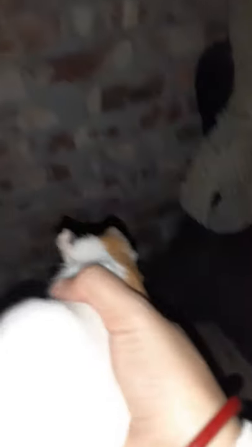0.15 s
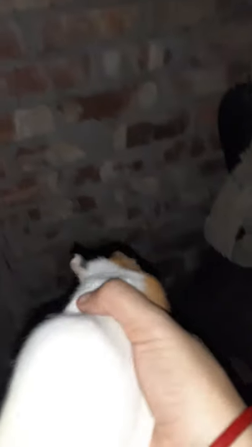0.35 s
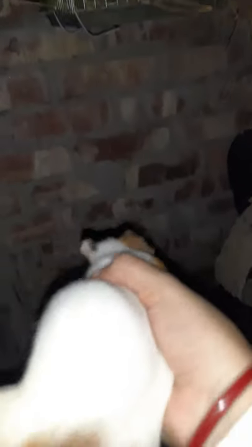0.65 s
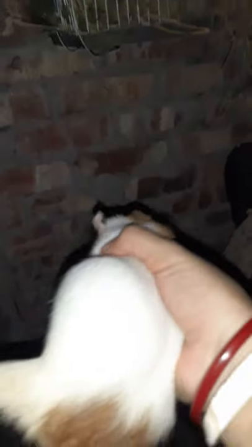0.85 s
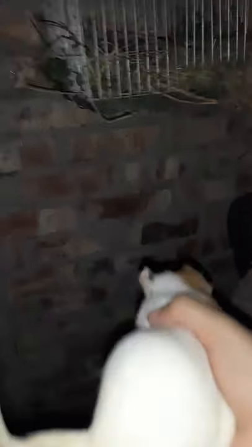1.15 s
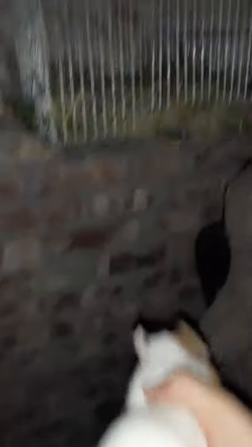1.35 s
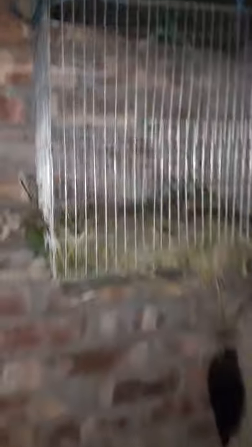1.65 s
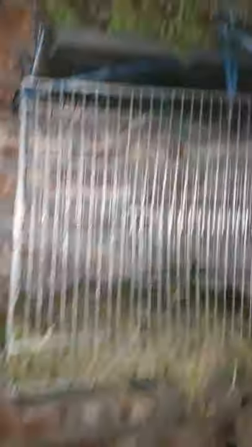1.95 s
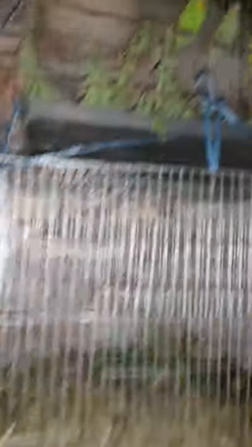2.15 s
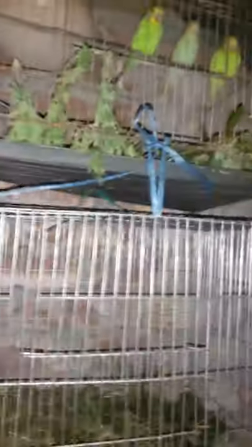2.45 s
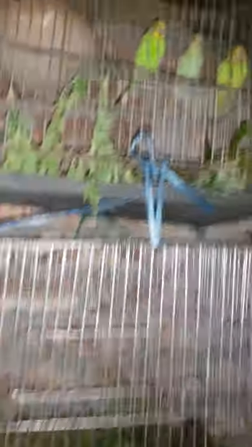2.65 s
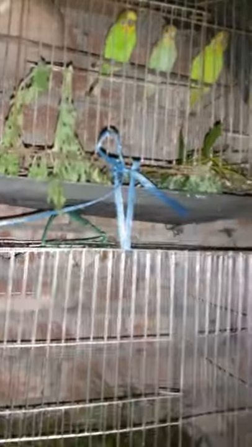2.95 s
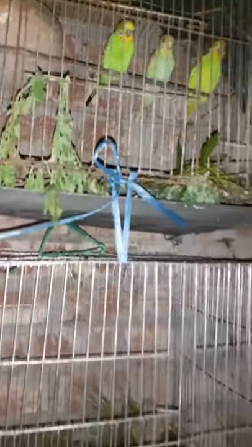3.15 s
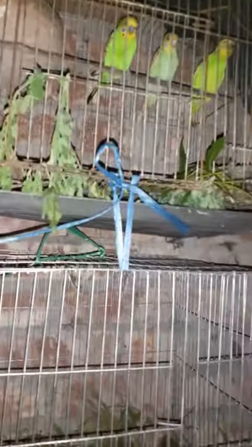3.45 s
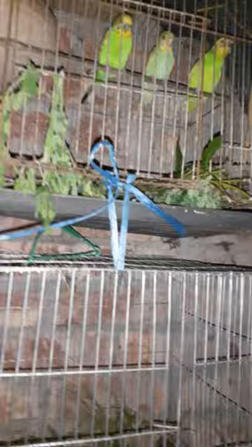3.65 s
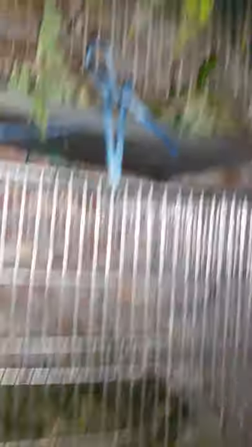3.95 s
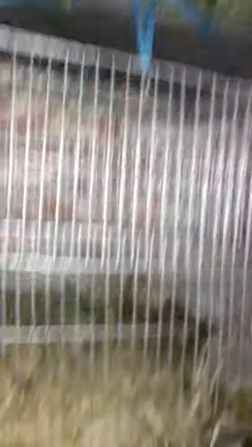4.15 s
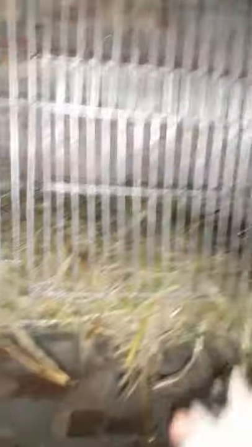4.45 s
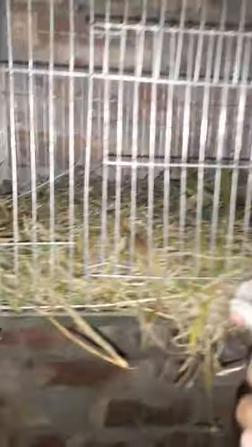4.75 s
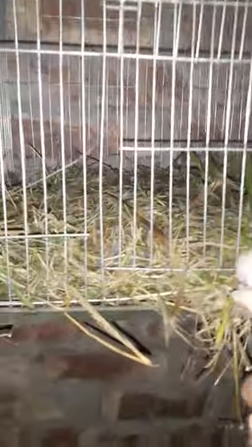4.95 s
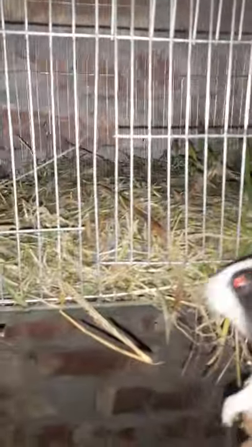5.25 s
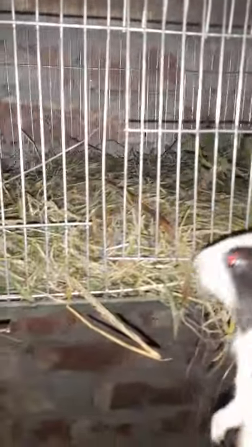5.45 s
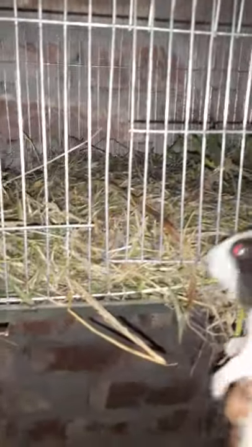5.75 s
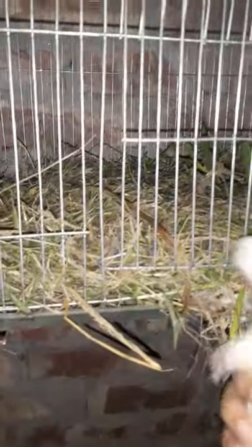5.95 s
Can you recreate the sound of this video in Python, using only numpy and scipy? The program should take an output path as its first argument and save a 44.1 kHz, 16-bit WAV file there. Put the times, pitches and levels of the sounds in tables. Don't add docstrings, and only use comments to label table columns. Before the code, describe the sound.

A guinea pig close by grunts and sweeps up into piercing squeals, then quieter wheeks, ending in a rough scream over a low motor hum.

```python
import sys
import numpy as np
from scipy import signal
from scipy.fft import rfft, irfft, next_fast_len
from scipy.io import wavfile
from scipy.ndimage import uniform_filter1d, minimum_filter1d

SR = 44100
rng = np.random.default_rng(int(sys.argv[2]) if len(sys.argv) > 2 else 0)


def natural_amplitude(level_db):
    exponent = np.asarray(level_db, float) / 20
    return 10 ** exponent


def put_to_file(sound):
    columns = np.atleast_2d(sound).T
    safe = np.clip(columns, -1, 1)
    whole_steps = np.round(safe * 32767)
    wavfile.write(sys.argv[1], SR, whole_steps.astype(np.int16))


N = 269451


def evened(x):
    return x / np.sqrt(np.mean(x ** 2) + 1e-20)


def read(points, hz):
    f, value = np.transpose(points)
    return np.interp(np.log(hz + 1), np.log(f + 1), value)


def slow(hz, size=N):
    return evened(signal.sosfilt(signal.butter(4, hz, fs=SR, output="sos"), rng.standard_normal(size)))


def gate(start, end, edge):
    t = np.arange(N) / SR
    return np.sin(np.pi / 2 * np.clip(np.minimum(t - start, end - t) / edge, 0, 1)) ** 2


def spells(table, edge):
    return sum(natural_amplitude(db) * gate(start, end, edge) for start, end, db in table)


def shaped(x, gain):
    size = next_fast_len(N + 64)
    return irfft(rfft(x, size) * gain(np.fft.rfftfreq(size, 1 / SR)), size)[..., :N]


def tone(turns, hz, db):
    return np.sqrt(2) * natural_amplitude(db) * np.sin(2 * np.pi * turns) * (hz < 17000)


def patchy(x):
    z = signal.stft(x, nperseg=256)[2]
    field = uniform_filter1d(rng.standard_normal(z.shape), size=5, axis=0)
    field = evened(uniform_filter1d(field, size=14, axis=1))
    return signal.istft(z * natural_amplitude(5 * field), nperseg=256)[1][:N]


# frequency in Hz, level in dB per Hz.
AIR = [(15, -25.5), (30, -22.5), (60, -14.5), (100, 4), (140, -6.5), (170, -11.5), (320, -8.5),
       (450, -15.5), (800, -22.5), (2000, -27), (3350, -34), (3800, -40), (8000, -46), (16000, -49.5)]
# frequency in Hz, left-right likeness from 0 to 1.
SAME = [(60, 1), (600, 0.25), (8000, 0.087)]
# time in seconds, level in dB.
RUSTLE = [(0, -3.5), (1.502, 3), (2.2, 0.5), (3.499, -4), (4.101, -4.5), (4.302, 5.5), (5.298, 5),
          (5.498, 0.4), (6.11, 4)]


def room_air():
    frames, hz = N // 256 + 5, np.fft.rfftfreq(1024, 1 / SR)
    a, b, c, d, patches = rng.standard_normal((frames, 513, 5)).T
    patches = evened(uniform_filter1d(uniform_filter1d(patches, 3, 0), 22, 1))
    t = np.arange(frames) * 256 / SR
    murmur_db = 8.5 * np.exp(-t / 1) - 3.5
    rustle_db = np.interp(t, *np.transpose(RUSTLE))
    swell_db = np.where(hz[:, None] < 500, murmur_db, rustle_db) * (hz[:, None] > 170)
    same = np.clip(read(SAME, hz), -1, 1)[:, None]
    left = a + 1j * b
    right = same * left + np.sqrt(1 - same ** 2) * (c + 1j * d)
    z = np.array([left, right]) * natural_amplitude(read(AIR, hz)[:, None] + 3.0 * patches + swell_db)
    return natural_amplitude(-62.5 + 9) * evened(signal.istft(z, nperseg=1024, noverlap=768)[1][:, :N])


# time in seconds, hum in Hz, level in dB.
MOTOR = [
    (0, 123.4, -53.5),
    (3.399, 124.9, -55),
    (3.681, 96, -47.5),
    (4.8, 94.17, -49),
    (6.11, 93.5, -47),
]
# multiple of the hum, level in dB against it.
ORDERS_DB = [(.5, -26), (1.5, -16.5), (3, -26)]


def motor():
    s, hz, db = np.transpose(MOTOR)
    t = np.arange(N) / SR
    hz, db = np.interp(t, s, hz) * (1 + 0.034 * slow(4.4)), np.interp(t, s, db)
    turns = np.cumsum(hz) / SR
    return sum(tone(k * turns, hz, db + rel_db + 1.4 * slow(20.47)) for k, rel_db in [(1, 0)] + ORDERS_DB)


# time in seconds, peak in dB, length in ms.
CLICKS = [(.292, -45.5, 30), (0.304, -37.5, 8.5), (0.561, -33, 35), (1.115, -16.5, 14.2), (1.255, -38, 6.9),
          (1.407, -25, 2.08), (1.412, -24, 2.15), (1.424, -15.5, 2.6), (1.429, -12, 2.2), (1.432, -17, 1.6),
          (1.439, -20, 4.4), (1.661, -23, 13.3), (2.103, -34.5, 2.7), (2.455, -47, 2.3), (2.604, -57, 8.6),
          (3.866, -61, 2), (3.976, -28, 4.9), (4.574, -28.5, 2.5), (4.583, -40, 7.4), (5.219, -44.5, 3.3),
          (5.642, -44.5, 82), (5.742, -18, 2.2), (6.003, -16.5, 2.6), (6.014, -39, 2.6)]


def clicks(snap):
    t, out = np.arange(N) / SR, np.zeros(N)
    for at, db, ms in CLICKS:
        out += natural_amplitude(db - 6.0) * snap * (t >= at) * np.exp(-np.maximum(t - at, 0) / (ms / 1000))
    return out


FACING_DB_PER_S = 1.04


def whistle(curve, hiss_db, onset_db, close_db, onset_s, root_db=0, root_follow=1, root_mouth=0, third_db=None):
    at, *controls = np.transpose(curve)
    s = np.arange(at[0], at[-1], 1 / 1000)
    hz, db, mouth_db = (np.interp(s, at, c) for c in controls)
    upper = (db, db + mouth_db) if third_db is None else (db + mouth_db, db + mouth_db + third_db)
    burst_db = onset_db * np.exp((at[0] - s) / onset_s) + close_db * np.exp((s - at[-1]) / 0.059)
    facing_db = FACING_DB_PER_S * s * (root_follow < .8)
    first_db = root_db + facing_db + root_follow * db + root_mouth * mouth_db
    return np.transpose([s, hz, first_db, *upper, db + hiss_db + burst_db])


# time in seconds, pitch in Hz, effort in dB, mouth opening in dB.
PEEPS = [
    [(2.535, 4100, -81.5, -30), (2.575, 4080, -72, -31), (2.6, 3450, -67, -30.5)],
    [(.696, 8665, -56, -43), (.713, 6892, -54.5, -40)],
    [(.3105, 5032, -7.5, 5), (.3135, 4932, -20.5, 7.5)],
    [(1.401, 3198, -40, 4), (1.416, 3342, -37, 14)],
    [(1.961, 3319, -37, -16), (1.978, 3498, -34.5, -23)],
    [(2.906, 2900, -36.5, -19), (2.92, 3376, -37, -7), (2.932, 3443, -35, -30), (2.947, 3392, -46.5, -21)],
    [(3.323, 3021, -34.5, -16), (3.338, 3203, -33, -27), (3.356, 3179, -43, -39.5)],
    [(3.751, 3112, -25.5, -15), (3.77, 3417, -50.5, -62.5), (3.79, 3445, -33, -7), (3.815, 3612, -38, -22)],
    [(4.351, 2937, -44.5, -15), (4.37, 2960, -50, -5)],
    [(5.651, 2898, -26, -34), (5.667, 2970, -34, -21), (5.697, 2930, -34.5, -14.5),
     (5.714, 3150, -24.5, -20), (5.724, 3190, -30, -18), (5.735, 3295, -37, 17)],
]
# time in seconds, pitch in Hz, effort in dB, mouth opening in dB.
SQUEALS = [
    [(.314, 4355, -13.5, -3.5), (.35, 4410, -12.5, 8.5), (.4, 4395, -23.5, 3), (.47, 4460, -18, -1.5),
     (.548, 4391, -18, 10), (.554, 4400, -32, 9.5), (.559, 4210, -12.5, -16)],
    [(.815, 3200, -33.5, 0), (.825, 3273, -14, -4.5), (.837, 3440, -13.5, -10), (.869, 3726, -19, 2.5),
     (.927, 3787, -10.5, 1), (.953, 3964, -10, 0), (1.009, 4123, -12, 2.5), (1.05, 4151, -14.5, 4.5),
     (1.112, 4193, -18, 7.5), (1.12, 4070, -17, -6)],
    [(1.436, 3960, -27, -9.5), (1.452, 3800, -19, -3), (1.47, 3732, -18, -3), (1.52, 3692, -14.5, -3),
     (1.55, 3890, -13.5, -3), (1.58, 4042, -18, -8.5), (1.63, 4147, -22.5, -3), (1.65, 4140, -18, 4.5),
     (1.659, 3975, -21, -13)],
    [(5.741, 3580, -15, -13), (5.77, 3580, -14, -23.5), (5.8, 3720, -18.5, -25), (5.85, 3843, -16, -21),
     (5.9, 3946, -20, -3.5), (5.95, 4096, -28.5, 4), (5.965, 4104, -31.5, -9), (5.985, 4039, -19.5, 5),
     (6.0, 4157, -24, 0)],
]
# time in seconds, pitch in Hz, effort in dB, mouth opening in dB.
PIPES = [
    [(1.982, 3740, -55.5, 3), (2.007, 3961, -47, 3), (2.035, 4051, -55, 12), (2.05, 3997, -52, 6),
     (2.075, 4107, -53.5, 4), (2.113, 4096, -50, 8.5), (2.12, 3955, -50, 0)],
    [(3.868, 4500, -53.5, 9), (3.9, 4448, -55, 7), (3.93, 4379, -30.5, -15), (3.945, 4348, -22.5, -28),
     (3.955, 4075, -47.5, -27), (3.967, 4046, -34, -54)],
    [(4.39, 3317, -53.5, 1), (4.42, 3572, -50.5, -5), (4.45, 3614, -46.5, -8), (4.468, 3688, -61, 9),
     (4.492, 3800, -58, 9), (4.505, 3813, -46, -8), (4.54, 3907, -45, -7), (4.568, 3958, -50.5, -3),
     (4.58, 3813, -51.5, -5.5)],
]
SQUEAL = dict(root_db=-24, root_follow=0.39, root_mouth=-0.045,
              hiss_db=-32, onset_db=15.5, close_db=16.5, onset_s=0.09)
PIPE = dict(root_db=-0.5, root_follow=0.95, root_mouth=-0.033,
            hiss_db=-54, onset_db=40, close_db=51, onset_s=0.0065)
PEEP = dict(third_db=-4, hiss_db=-36, onset_db=8.5, close_db=5, onset_s=.015)


def whistles():
    kinds = [(SQUEALS, SQUEAL), (PIPES, PIPE), (PEEPS, PEEP)]
    return [whistle(curve, **kind) for curves, kind in kinds for curve in curves]


# time in seconds, fundamental in dB, fourth and higher partials in dB.
TONGUE = [(.82, -3, -12), (.86, 1.5, -14), (.89, 0.5, -11), (.915, 2.5, -5), (.945, -1.5, -7), (1.0, 3, -3),
          (1.2, 2.5, -1), (1.4, -0.5, -1.5), (5.7, -0.5, 1), (5.745, -2.5, 7), (5.768, -6, 18),
          (5.785, -4.5, -3), (5.82, -6.5, -4.5), (5.86, -3.5, -9), (5.9, 2.5, -9)]
# frequency in Hz, level in dB.
UPPER = [(1500, 0), (2300, -5), (3400, -17), (4300, -34), (6200, -42), (8000, -26), (15000, -22)]


def partials(hz, turns, gliding, low_db):
    t = np.arange(N) / SR
    s, *tongue = np.transpose(TONGUE)
    root_db, fourth_db = (np.interp(t, s, c) * (hz > 3000) for c in tongue)
    db1, db2, db3 = low_db
    levels = [db1 + root_db, db2, db3]
    for k in range(4, 9):
        f = k * hz
        nasal_db = -11 * (1 - gliding) * np.exp(-((f - 2720) / 260) ** 2)
        streak_db = (30 - 5 * t) * gliding * (f > 5800)
        tract_db = np.where(hz > 3000, fourth_db, nasal_db + streak_db)
        colour_db = read(UPPER, f) - read(UPPER, np.minimum(3 * hz, f / 2 + 1500))
        levels.append(db3 + tract_db + colour_db - 4 * (k - 3.4))
    out = np.zeros(N)
    for k, db in enumerate(levels, 1):
        flutter_db = .6 + 1.3 * min(k, 4) * gliding + .6 * (k - 1) * (hz < 1200)
        out += tone(k * turns, k * hz, db + flutter_db * slow(160) - 2.2 * k * gliding)
    return out


# frequency in Hz, level in dB per Hz.
BREATH = [(300, -49.5), (1500, -39), (2600, -27), (3400, -15.5), (4200, 2), (5300, -27.5), (6300, 4),
          (7500, 5.5), (9500, 10), (12000, 0), (14000, -16), (15300, 3)]


def breath(voiced, breath_db, puffs, gliding, snap):
    air = evened(shaped(patchy(rng.standard_normal(N)), lambda f: natural_amplitude(read(BREATH, f))))
    breathing = uniform_filter1d(voiced, size=400, origin=170)
    return breathing * natural_amplitude(breath_db + 2.5 + 1.5 * slow(28)) * puffs * (air + 1.2 * gliding * snap)


# start in seconds, end in seconds, level in dB against the voice.
CHAOS = [(0.317, 0.397, -18), (0.365, 0.508, -27.5), (.82, 0.898, -22), (1.394, 1.416, 0.5),
         (1.425, 1.456, -4), (1.482, 1.497, -11), (1.53, 1.559, -12.5), (5.65, 5.725, 0.5),
         (5.763, 5.912, -6), (5.91, 5.951, -1)]
# frequency in Hz, level in dB.
SMEAR = [(2800, -38.5), (3800, -14), (4500, -36.5), (5200, -26.5), (5900, -3.5), (9300, 4), (9800, -30),
         (10350, -29), (10800, -8), (12900, -5.5), (13400, -27), (13900, -22.5), (14400, -5.5), (15300, -3)]


def chaos(hz, turns, db):
    slipping = turns + .17 * slow(600)
    overtones = sum(tone(k * slipping, k * hz, db) for k in range(1, 5))
    return shaped(natural_amplitude(-1.0) * patchy(overtones) * spells(CHAOS, 0.016), lambda f: natural_amplitude(read(SMEAR, f)))


def grunt(start, climb, end, rest_hz, end_hz, level_db, slope_db, strain_db, breath_db, climb_db, mouth):
    s = np.arange(start, end, 1 / 1000)
    t, knee_s = s - start, 0.0074
    up = np.logaddexp(0, (s - climb) / knee_s) / np.logaddexp(0, (end - climb) / knee_s)
    scoop = 3.4 * (climb - start) * np.exp(-t / 0.013)
    held = rest_hz * (1 + scoop) + 210 * t
    hz = held + (end_hz - held) * up ** 1.5
    db = level_db - 6 * np.exp(-t / 0.024)
    step_db = slope_db + strain_db * (rest_hz - 650) - 3 * np.exp(-t / 0.046) - 1 * up
    levels = [db + k * step_db + read(mouth, (k + 1) * hz) for k in range(3)]
    away_db = -10.5 * min(start, 2)
    return np.transpose([s, hz, *levels, breath_db + climb_db * np.log2(hz / held) + away_db])


# start in seconds, climb begins in seconds, end in seconds,
# resting pitch in Hz, end pitch in Hz.
OPEN_GRUNTS = [
    (0.726, 0.766, .81, 888.5, 2250),
    (1.269, 1.324, 1.4, 857, 3144),
    (1.829, 1.88, 1.96, 837, 3564),
]
# start in seconds, climb begins in seconds, end in seconds,
# resting pitch in Hz, end pitch in Hz.
SHUT_GRUNTS = [(2.313, 2.378, 2.44, 747.6, 2126), (2.772, 2.852, 2.885, 669, 1470),
               (3.191, 3.267, 3.322, 655.7, 3063), (3.626, 3.7, 3.75, 629, 2990),
               (4.186, 4.245, 4.35, 626.3, 2928), (4.744, 4.838, 4.89, 668, 2112),
               (5.571, 5.587, 5.65, 673.6, 2935)]
# frequency in Hz, level in dB.
OPEN = dict(level_db=-35, slope_db=-6.5, strain_db=0, breath_db=-38, climb_db=-1.5, mouth=[(900, -3),
        (1450, 3.5), (1900, -2), (2600, -5), (3300, -12.5), (4300, -18), (9000, -29)])
SHUT = dict(level_db=-40.5, slope_db=-4.5, strain_db=-0.0046, breath_db=-69, climb_db=13, mouth=[(650, 1.75),
        (900, 3.5), (1400, -6.5), (2100, 3), (3000, 1.5), (4300, -18), (5200, -34), (9000, -43)])


def grunts():
    return [grunt(*row, **OPEN) for row in OPEN_GRUNTS] + [grunt(*row, **SHUT) for row in SHUT_GRUNTS]


# start in seconds, end in seconds, level in dB.
RASPS = [(0.726, 0.838, -40.5), (1.265, 1.41, -42), (1.81, 1.951, -48.5), (2.391, 2.455, -60),
         (2.849, 2.924, -53.5), (3.261, 3.335, -53.5), (3.694, 3.777, -54.5), (4.246, 4.401, -51.5),
         (4.851, 4.897, -63), (5.604, 5.662, -57)]
# frequency in Hz, level in dB per Hz.
RASP = [(1200, -11.5), (2200, -1.5), (2950, -12), (3500, 0), (4200, -4), (4900, -20), (5500, -36),
        (6300, -7.5), (7300, 0), (8500, -12), (9700, -33), (11000, -12), (13400, -22.5), (15000, -14)]


def rasps(puffs):
    hoarse = evened(shaped(patchy(rng.standard_normal(N)), lambda f: natural_amplitude(read(RASP, f))))
    return hoarse * puffs * natural_amplitude(1.5 * slow(65)) * spells(RASPS, 0.048)


# frequency in Hz, level in dB.
THROAT = [(400, -1), (1400, 2), (2050, -19), (2600, -10.5), (4000, -11), (5100, -16.5), (6200, 3.5),
          (8500, 0), (10300, -1.5), (12500, 1), (15000, 1.5)]
# start in seconds, end in seconds, level in dB.
DOUBLING = [(0.733, 0.79, -45), (1.276, 1.36, -44), (1.545, 1.598, -16.5), (1.587, 1.649, -17),
            (1.833, 1.915, -44), (5.898, 5.983, -18)]


def half_pitch_lines(hz, turns):
    t, out = np.arange(N) / SR, np.zeros(N)
    for k in range(4):
        f = (k + .5) * hz
        facing_db = FACING_DB_PER_S * t * (k == 0) * (hz > 3000)
        out += tone((k + .5) * turns, f, read(THROAT, f) - 11.0 * max(k - 1, 0) * (hz < 3000) + facing_db + slow(70))
    return out * spells(DOUBLING, 0.0099)


# time in
# seconds, pitch in Hz, level in dB, length in seconds.
FUZZY_BANDS = [(0.86, 98, -44, 0.19), (2.213, 99.1, -41, 0.055), (2.574, 92.7, -46.5, 0.11),
               (4.282, 480.4, -41.5, 0.11), (4.261, 1490, -50.5, 0.099), (4.287, 2860, -47.5, 0.24),
               (4.733, 3217, -56, 0.098), (4.8, 105.9, -41.5, 0.085), (5.201, 2910, -59.5, 0.18),
               (6.1, 105, -46, 0.12), (3.13, 1550, -68.5, 0.11), (5.05, 2960, -63, 0.051),
               (5.22, 2100, -51.5, 0.017), (5.334, 2960, -52, 0.093), (5.39, 3400, -66, 0.14),
               (5.27, 2700, -59, .1), (4.954, 2100, -60, 0.017), (5.03, 3100, -59.5, 0.068)]


def fuzzy_bands():
    t, out = np.arange(N) / SR, np.zeros(N)
    for at, hz, db, length in FUZZY_BANDS:
        fuzz = slow(min(hz / 4, 300))
        out += tone(hz * t, 0, db) * fuzz * gate(at - length / 2, at + length / 2, length / 2)
    return out


# start in seconds, end in seconds, start pitch in Hz, end pitch in Hz,
# level in dB, fuzz in Hz.
SECOND = [(0.851, 0.919, 2472, 2539, -21.5, 10.5), (0.925, 0.973, 2544, 2507, -43.5, 11.2),
          (1.474, 1.499, 2420, 2400, -25.5, 260), (1.529, 1.566, 2444, 2460, -26.5, 160),
          (5.768, 5.912, 2226, 2262, -30.5, 329), (5.766, 5.914, 2596, 2710, -30.5, 68)]
# multiple of the voice, multiple of the second vibration, level in dB.
MIXING = [(0, 1, 3), (1, -1, -36), (0, 2, 5), (1, 1, 0), (1, 2, -2), (2, 1, -3), (2, 2, -4), (3, 1, -4)]


def second_vibration(hz, turns):
    out = np.zeros(N)
    for start, end, from_hz, to_hz, db, fuzz_hz in SECOND:
        cut = slice(int(start * SR), int(end * SR))
        f = hz[cut]
        g = np.linspace(from_hz, to_hz, len(f))
        beat = np.cumsum(g) / SR
        scream_db = {(0, 2): -44, (2, 1): -44, (0, 1): 12} if start > 5 else {}
        mixed = np.zeros(len(f))
        for m, n, mix_db in MIXING:
            flutter = 1 if fuzz_hz < 30 else slow(fuzz_hz, len(f))
            mix_hz = m * f + n * g
            level_db = mix_db + scream_db.get((m, n), 0) + read(THROAT, mix_hz)
            mixed += flutter * tone(m * turns[cut] + n * beat, mix_hz, level_db)
        out[cut] += natural_amplitude(db) * gate(start, end, 0.018)[cut] * mixed
    return out


# start in seconds, end in seconds, pitch in Hz, level in dB.
WHINE = (5.783, 5.834, 4870, -41)


def whine():
    start, end, hz, db = WHINE
    return tone(hz * np.arange(N) / SR, 0, db + 2.0 * slow(40)) * gate(start, end, 0.025)


# start in seconds, end in seconds, slip in turns, speed in Hz.
RAGGED = (5.768, 5.905, .04, 240)


def guinea_pig():
    stretches = grunts() + whistles()
    s, *columns = np.concatenate(stretches).T
    order, t = np.argsort(s), np.arange(N) / SR
    hz, *low_db, breath_db = (np.interp(t, s[order], c[order]) for c in columns)
    voiced = sum(gate(rows[0][0] - .001, rows[-1][0] + .002, .003) for rows in stretches).clip(0, 1)
    hz = hz * (1 + .0018 * slow(50) + .0006 * slow(300))
    rise = uniform_filter1d(np.gradient(np.log(hz)), size=400) * SR
    gliding = np.clip(rise / 12, 0, 1)
    turns = np.cumsum(hz * (1 + .035 * gliding * (hz < 3000) * slow(220))) / SR
    start, end, slip, slip_hz = RAGGED
    turns = turns + slip * gate(start, end, .008) * slow(slip_hz)
    puffs = 1 + .6 * np.cos(2 * np.pi * turns)
    snap = evened(shaped(rng.standard_normal(N), lambda f: natural_amplitude(.4 * read(BREATH, f))))
    voice = voiced * partials(hz, turns, gliding, low_db)
    faults = half_pitch_lines(hz, turns) + second_vibration(hz, turns) + whine() + chaos(hz, turns, low_db[1])
    return voice + faults + breath(voiced, breath_db, puffs, gliding, snap) + rasps(puffs) + clicks(snap)


# frequency in Hz, time to fall 60 dB in seconds.
WALLS = [(500, 0.31), (3300, 0.41), (4200, 0.33), (12000, 0.18)]


def walls(x):
    taps = np.zeros((2, SR // 2))
    slots = np.arange(300, SR // 2 - 20, 20)
    at = slots + rng.integers(0, 20, (2, len(slots)))
    np.put_along_axis(taps, at, rng.choice([-1., 1.], at.shape), 1)
    hz, t, z = signal.stft(taps, SR, nperseg=256)
    tail = signal.istft(z * natural_amplitude(-60 * t / read(WALLS, hz)[:, None]), SR, nperseg=256)[1]
    return natural_amplitude(-18) * signal.fftconvolve(x[None], tail / np.linalg.norm(tail[0]), axes=1)[:, :N]


# time in seconds, pitch in Hz, level in dB.
MUTTER = [(4.945, 446, -67.5), (4.965, 457, -67.5), (5.001, 478.6, -65.5), (5.05, 535, -57.5),
          (5.075, 547, -76.5), (5.13, 574, -80), (5.155, 557, -64), (5.19, 541, -62), (5.245, 587, -60),
          (5.275, 678, -60.5), (5.305, 1138, -54), (5.33, 1473, -55.5), (5.352, 1850, -61.5),
          (5.385, 1890, -61.5), (5.43, 1820, -66.5)]


def mutter():
    s, hz, db = np.transpose(MUTTER)
    hz, db = (np.interp(np.arange(N) / SR, s, c) for c in (hz, db))
    turns = np.cumsum(hz * (1 + .05 * slow(154))) / SR
    out = np.zeros(N)
    for k, rel_db in [(1, -6.0), (2, 3.5), (4, -11.0)]:
        far_db = -2.5 * k * hz / 1000
        out += tone(k * turns, hz, db + 4.4 * slow(66) + rel_db + far_db)
    return gate(s[0], s[-1], 0.018) * out


def scene():
    pig = guinea_pig()
    return pig + mutter() + walls(pig) + motor() + fuzzy_bands() + room_air()


# band number, 690 Hz wide.
STARVED = [4, 7, 14, 19]
FAVOURED = [2, 3]


def masked(x):
    z = signal.stft(x, nperseg=1024)[2]
    power = (abs(z[:, :512]) ** 2).reshape(2, 32, 16, -1)
    whim = evened(uniform_filter1d(rng.standard_normal((32, z.shape[2])), size=10, axis=1))
    band = np.arange(32)
    spared = (1. - 2.2 * np.isin(band, STARVED) + np.isin(band, FAVOURED))[:, None]
    loudest = power[:, 2:].max((0, 1, 2))
    keep = natural_amplitude(2 * 7 * (spared + whim / 2)) * power.max(2) > loudest * natural_amplitude(2 * -43)
    keep[:, :2] = True
    z[:, :512] *= np.repeat(keep, 16, axis=1)
    return signal.istft(z, nperseg=1024)[1][:, :N]


def band_limit(x):
    return signal.sosfilt(signal.butter(12, 16440, fs=SR, output="sos"), x)


# frequency in Hz, left lead in radians, left minus right in dB.
PORTS = [(0, 0, -2), (300, .2, -1), (1000, .3, 4), (1500, 1.0, 6), (2200, 3.0, 7), (3300, 4.2, 8),
         (4200, 5.8, 0), (5200, 4.6, -4), (5900, 6.5, -4), (6600, 8.2, -1), (7500, 6.7, 0),
         (16500, -7.9, 0)]


def record(dry):
    hz, lead, balance_db = np.transpose(PORTS)
    half_db = lambda f: np.interp(f, hz, balance_db) / 2
    left = shaped(dry[0], lambda f: natural_amplitude(half_db(f)) * np.exp(1j * np.interp(f, hz, lead)))
    right = shaped(dry[1], lambda f: natural_amplitude(-half_db(f)))
    edged = shaped(np.array([left, right]), lambda f: natural_amplitude(-np.clip(f - 15650, 0, 800) / 6))
    peak = uniform_filter1d(-minimum_filter1d(-abs(edged).max(0), size=400), size=200)
    return band_limit(masked(edged / np.maximum(peak, 1)))


dry = scene()
out = record(dry)
put_to_file(out)
```